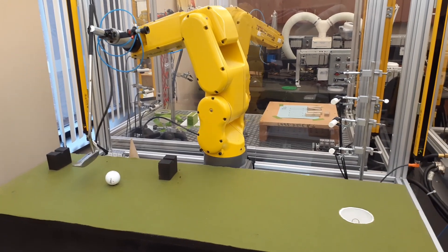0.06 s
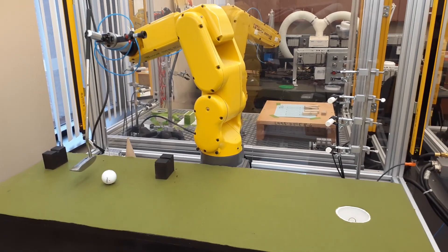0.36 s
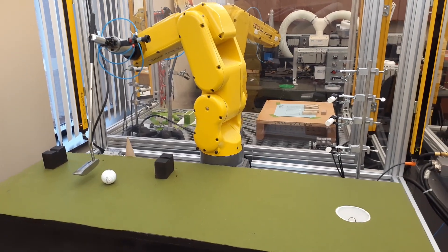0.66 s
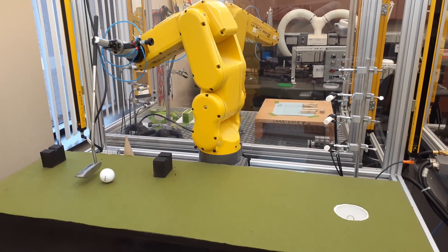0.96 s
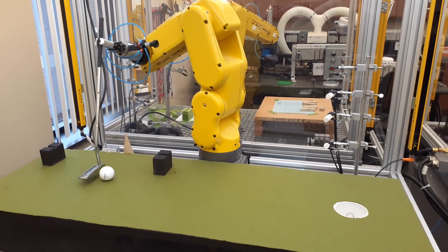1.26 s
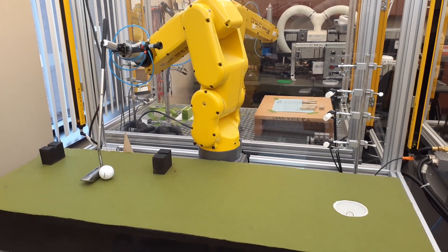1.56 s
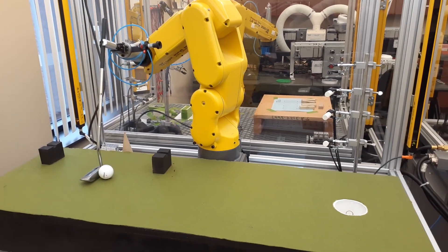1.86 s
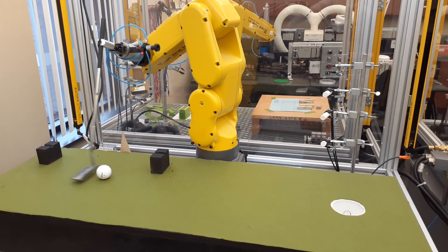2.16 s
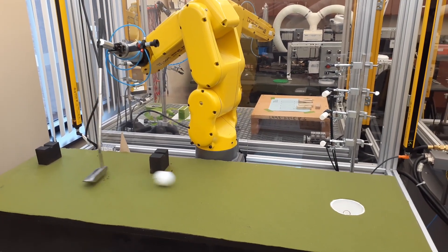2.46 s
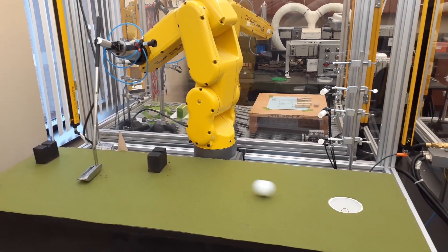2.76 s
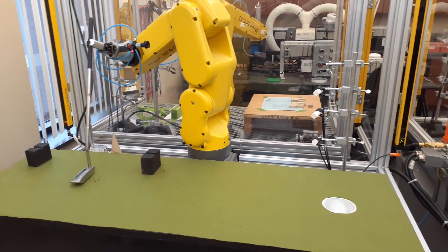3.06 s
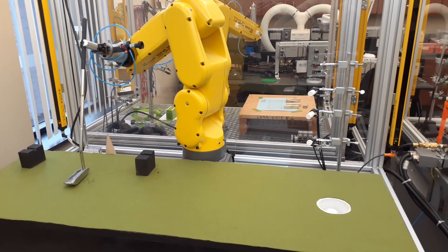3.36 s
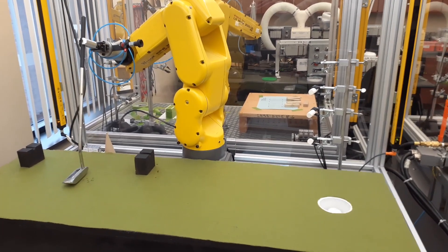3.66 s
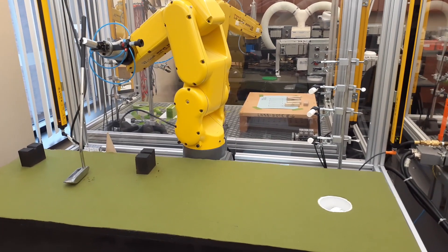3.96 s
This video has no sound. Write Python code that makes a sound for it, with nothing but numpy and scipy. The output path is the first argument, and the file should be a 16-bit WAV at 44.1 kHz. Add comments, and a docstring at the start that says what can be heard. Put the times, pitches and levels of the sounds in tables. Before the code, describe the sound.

A golf ball is struck with a sharp putter click, then drops into a plastic cup, rattling and bouncing to rest. Ventilation rumbles and a robot arm whines faintly in a small lab, heard from nearby.

```python
"""A small lab: a robot arm taps a golf ball across a putting table. The club face cracks and rings;
the ball drops into a plastic cup, rattles between its walls and bounces to rest, each blow
ringing the plastic and shaking the table top. Ventilation rumbles, the mains hum, and the
arm's servo drives whine faintly over the hiss of its gears."""
import sys
import numpy as np
from scipy import signal
from scipy.fft import rfft, irfft
from scipy.io import wavfile
from scipy.ndimage import uniform_filter1d

SR = 44100
rng = np.random.default_rng(int(sys.argv[2]) if len(sys.argv) > 2 else 0)


def transcribe(u):
    """Save the signal u as a 16-bit wav file named by the first command-line argument.

    u: samples, shape (n,) or (channels, n), limited to [-1, 1]; the rate is SR.
    q: integer samples, one column per channel.
    """
    v = np.clip(np.atleast_2d(u).T, -1, 1)
    q = np.round(v * 32767).astype(np.int16)
    wavfile.write(sys.argv[1], SR, q)


N = 176400
BLOW_S = 0.015  # window that sets a blow's level


def undb(db):
    return 10 ** (np.asarray(db) / 20)


def over_hz(points, hz):
    """Interpolate (f/Hz, value) rows on a log-frequency axis."""
    p = np.array(points, float)
    return np.interp(np.log(np.maximum(hz, 1)), np.log(p[:, 0]), p[:, 1])


def over_time(points, column=1):
    """Interpolate one column of (t/s, values) rows at every sample."""
    p = np.array(points, float)
    return np.interp(np.arange(N) / SR, p[:, 0], p[:, column])


def freqs(x):
    return np.fft.rfftfreq(x.shape[-1], 1 / SR)


def colour(x, points):
    """Zero-phase filter from (f/Hz, gain/dB) rows."""
    return irfft(rfft(x) * undb(over_hz(points, freqs(x))), x.shape[-1])


def causal(x, points):
    """Minimum-phase filter from (f/Hz, gain/dB) rows: no ringing ahead of the attack."""
    cepstrum = irfft(np.log(undb(over_hz(points, freqs(x)))))
    cepstrum[1:SR // 2] *= 2
    cepstrum[SR // 2 + 1:] = 0
    return irfft(rfft(x) * np.exp(rfft(cepstrum)))


def low_cut(x, hz):
    return signal.sosfilt(signal.butter(4, hz, "high", fs=SR, output="sos"), x)


def pan(x, points):
    """Constant-power pan from (f/Hz, L-R/dB) rows."""
    gain = undb(over_hz(points, freqs(x)) * np.array([[.5], [-.5]]))
    return irfft(rfft(x) * gain / np.sqrt(np.mean(gain ** 2, axis=0)), x.shape[-1])


def unit(x, span_s=None):
    """Scale to rms 1, overall or over the first span_s."""
    part = x if span_s is None else x[..., :int(span_s * SR)]
    return x / np.sqrt(np.mean(part ** 2))


def fade(t60_s):
    """Exponential decay, 1 s long."""
    return np.exp(-np.log(1000) * np.arange(SR) / SR / t60_s)


def add(out, x, start_s):
    i = int(start_s * SR)
    count = min(x.shape[-1], N - i)
    out[:, i:i + count] += x[:, :count]


def walk(rate_hz):
    """Smooth random wander, rms 1."""
    hold = int(SR / rate_hz)
    steps = np.repeat(rng.standard_normal(N // hold + 1), hold)
    return unit(uniform_filter1d(uniform_filter1d(steps, hold), hold)[:N])


def tone(hz, waver_db, rate_hz):
    """Sine of rms near 1 with a wavering level."""
    sine = np.sqrt(2) * np.sin(2 * np.pi * (hz * np.arange(N) / SR + rng.random()))
    return sine * undb(waver_db * walk(rate_hz))


def ring(modes, spread_rad, scatter_db=0, ear_lag_s=0.00019):
    """Struck modes of alternating sign; the higher ones reach the two ears more out of step."""
    t, out = np.arange(SR) / SR, 0
    for k, (hz, db, t60_s) in enumerate(modes):
        size, offset = rng.standard_normal(2)
        skew = np.pi * hz * ear_lag_s + spread_rad * offset * min(hz / 1000, 1)
        phase = np.clip(skew, -np.pi / 4, np.pi / 4) * np.array([[1], [-1]])
        envelope = undb(db + scatter_db * size) * fade(t60_s)
        out = out + (-1) ** k * envelope * np.sin(2 * np.pi * hz * t + phase)
    return out


# stereo width: f/Hz, side over mid/dB
WIDTH = [(60, -20), (130, -20.5), (280, -14), (550, -7.5), (1100, -2), (3000, 1.5)]


def stereo_noise(points, count):
    """Coloured noise, rms 1: alike in both ears in the bass, unrelated in the treble."""
    mid, side = rng.standard_normal((2, count))
    return unit(colour(mid + colour(side, WIDTH) * np.array([[1], [-1]]), points))


# fan spectrum: f/Hz, relative density/dB
FAN_SPECTRUM = [(25, -12), (38, -17), (52, -6.5), (85, -5), (130, 0.5), (190, -1.5), (270, -3), (380, -12),
                (650, -13), (1000, -17.5), (1400, -21), (1900, -20.5), (2500, -36.5), (3500, -44.5),
                (5500, -50), (7500, -58), (12000, -58), (14000, -58), (16000, -50)]
# balance of fan, arm and putter: f/Hz, L-R/dB
LAB_PAN = [(600, 0.5), (1300, 1), (2400, -1.5), (4200, 18), (7000, 15), (13000, 17)]


def ventilation(fan_db=-40.5, hum_db=-51, hum_hz=120.7):
    """Fan rumble plus mains hum."""
    fan = undb(fan_db + .5 * walk(rate_hz=5.35)) * stereo_noise(FAN_SPECTRUM, N)
    hum = undb(hum_db) * tone(hum_hz, waver_db=2.5, rate_hz=6.8)
    return pan(fan, LAB_PAN) + hum


# steady switching harmonics: order; left/dB, right/dB
WHINE_ORDERS = [1, 2, 4]
WHINE_DB = [(-69, -96), (-61.5, -87.5), (-63.5, -90)]
# third harmonic and its sidebands: f/Hz; relative level/dB
THIRD_HZ = [11143, 11357, 11570]
THIRD_DB = [-10, 5, -22]
# their envelope: t/s, left/dB, right/dB
THIRD_ENVELOPE = [(0, -57.5, -78), (.2, -57, -78), (.45, -60.5, -82), (.58, -60.5, -84), (.8, -56, -74),
                  (1.3, -54, -65), (1.7, -59, -70.5), (2.15, -66.5, -72), (2.45, -63.5, -71),
                  (2.7, -66, -72.5), (3.0, -57.5, -70), (3.5, -57.5, -81), (4, -57, -77)]


def servo_drives(switching_hz=3785, waver_db=.6):
    """Switching whine; the third harmonic is strongest, and swells and sinks."""
    steady = sum(undb([[left], [right]]) * tone(order * switching_hz, waver_db, rate_hz=12)
                 for order, (left, right) in zip(WHINE_ORDERS, WHINE_DB))
    third = sum(undb(db) * tone(hz, waver_db, rate_hz=30) for hz, db in zip(THIRD_HZ, THIRD_DB))
    envelope = undb([over_time(THIRD_ENVELOPE, column) for column in (1, 2)])
    return steady + third * envelope


# axis whine: t/s, level/dB of harmonics 1, 2, 3
AXIS_ENVELOPE = [(0, -76, -66, -82), (.1, -76, -66, -86), (.16, -67, -65, -74), (.22, -80, -66, -76),
                 (.32, -70, -65, -82), (.42, -78, -66, -76), (.47, -63, -66, -74), (.62, -71, -70, -78),
                 (.71, -70, -69, -81), (.85, -77, -58.5, -81), (1.25, -73, -59.5, -84),
                 (1.38, -70, -61, -75), (1.5, -75, -62.5, -83), (1.75, -82, -79, -68),
                 (2.15, -84, -85, -65), (2.3, -78, -62, -81), (2.5, -77, -76, -88), (4, -82, -96, -84)]
# gear hiss: f/Hz, relative density/dB; t/s, level/dB
GEAR_SPECTRUM = [(2000, 1), (3300, -2.5), (4600, -1), (7000, -12), (8700, -5), (10300, -11), (12300, 2),
                 (14000, -11), (16000, -1)]
GEAR_ENVELOPE = [(0, -59.5), (.3, -61), (.65, -61.5), (1.3, -59.5), (1.7, -62), (2.1, -63), (2.5, -61),
                 (3, -67), (4, -90)]


def arm_motion(axis_hz=4000):
    """The moving axis whines and its gears hiss."""
    whine = sum(undb(over_time(AXIS_ENVELOPE, k)) * tone(k * axis_hz, waver_db=1, rate_hz=21)
                for k in (1, 2, 3))
    hiss = stereo_noise(GEAR_SPECTRUM, N) * undb(over_time(GEAR_ENVELOPE) + 1.4 * walk(rate_hz=26))
    return pan(whine + hiss, LAB_PAN)


# lab echo: f/Hz, gain/dB; f/Hz, t60/s
ROOM_EQ = [(100, -2.5), (250, 10), (600, 2.5), (1300, -2), (2500, 2), (5000, -9.5), (10000, 0),
           (16000, -28)]
ROOM_DECAY = [(150, 0.46), (500, 0.32), (1500, 0.2), (4000, 0.33), (14000, 0.25)]


def room(x, wet_db=-7.5, delay_s=.005):
    """Direct sound plus dense reflections, decaying band by band."""
    noise = stereo_noise([(20, 0), (20000, 0)], SR)
    centres_hz, tail = [hz for hz, _ in ROOM_DECAY], 0
    for weights, (_, t60_s) in zip(np.eye(len(centres_hz)), ROOM_DECAY):
        share = over_hz(list(zip(centres_hz, weights)), freqs(noise))
        band = irfft(rfft(noise) * share)
        tail = tail + band * fade(t60_s) / np.linalg.norm(fade(t60_s))
    echo = np.zeros((2, N))
    add(echo, signal.fftconvolve(x, causal(tail, ROOM_EQ), axes=1), delay_s)
    return x + undb(wet_db) * echo


# arm tick, club crack: f/Hz, relative density/dB
TICK_SPECTRUM = [(2000, -17), (4500, -6), (6000, 0), (9500, -5), (12000, -18), (16000, -33)]
CRACK_SPECTRUM = [(300, 1), (1200, 4.5), (2600, -2.5), (3400, -10), (4100, 1), (5400, -11.5), (6400, -6),
                  (7200, -13), (8700, -7.5), (10800, -12), (11700, -5), (13000, -14), (16000, -18)]
# putter-on-ball modes: f/Hz, level/dB, t60/s
PUTTER_MODES = [(538, -34.5, 0.35), (651, -36.5, 0.18), (1200, -28.5, 0.038), (1497, -35, .1),
                (1740, -28, 0.026), (3950, -34, .045), (4100, -36, 0.054), (4310, -38, 0.059),
                (6260, -46, .05), (7850, -50, 0.032), (9080, -53, 0.067), (11850, -44, 0.054)]


def putter(tick_db=-58, crack_db=-37):
    """The arm ticks as it swings; the club face cracks against the ball and rings."""
    out = np.zeros((2, N))
    tick = unit(stereo_noise(TICK_SPECTRUM, SR) * fade(t60_s=0.068), BLOW_S)
    add(out, undb(tick_db) * tick, start_s=2.2552)
    face = ring(PUTTER_MODES, spread_rad=0.35)
    crack = unit(stereo_noise(CRACK_SPECTRUM, SR) * fade(t60_s=.08), BLOW_S)
    add(out, face + undb(crack_db) * crack, start_s=2.3668)
    return out


# modes of the table top and the hollow under it: f/Hz; relative level/dB, t60/s
TABLE_HZ = [225, 260, 320, 353, 440, 516, 564, 657, 780, 821, 983, 1074, 1303]
TABLE_RING = [(-22, 0.25), (-19, .6), (-30, .5), (-14, 0.42), (-15.5, 0.38), (-12.5, 0.35), (-13.5, 0.53),
              (-11.5, 0.33), (-26, 0.21), (-23, 0.27), (-15, 0.18), (-24, 0.37), (-20, 0.16)]


def table_boom(thud_db, coupling_db=1, rise_s=0.077):
    """A thud in the cup builds up in the table's modes."""
    modes = np.column_stack([TABLE_HZ, TABLE_RING])
    boom = ring(modes, spread_rad=0.19, scatter_db=1.5)
    return undb(thud_db + coupling_db) * boom * (1 - fade(rise_s))


# dense modes of the plastic: f/Hz, relative density/dB
PLASTIC_SPECTRUM = [(150, -25), (300, 0.5), (600, 8), (1300, 2), (2100, -6), (2500, -11.5), (3000, -13.5),
                    (3700, -13.5), (4400, -19), (5400, -16.5), (7200, -25), (8400, -18.5), (10000, -24.5),
                    (12500, -15.5), (14000, -28), (16000, -20.5)]
# thud, knock, clack, click and tick bands: centre f/Hz; edge f/Hz
BAND_HZ = [450, 1050, 2200, 5000, 10000]
BAND_EDGES_HZ = [700, 1500, 3600, 7000]


def strike(modes, bands_db, dense_db, spot_hz, spot_db, t60_s=0.086, rise_s=0.0024, spot_oct=0.088):
    """One blow on plastic: clear and dense modes, coloured by where and how hard the ball lands."""
    dense = unit(stereo_noise(PLASTIC_SPECTRUM, SR) * fade(t60_s) * (1 - fade(rise_s)), BLOW_S)
    clear = unit(ring(modes, spread_rad=0.21, scatter_db=2.9), BLOW_S)
    # the struck spot favours one resonance
    corners_hz = spot_hz * 2 ** (spot_oct * np.array([-1.65, -1.3, 1.14, 0.77]))
    blow = causal(clear + undb(dense_db) * dense, list(zip(corners_hz, [0, spot_db, spot_db, 0])))
    power = abs(rfft(blow)) ** 2 / SR ** 2 / BLOW_S
    band = np.searchsorted(BAND_EDGES_HZ, freqs(blow))
    gains_db = [db - 10 * np.log10(power[band == k].sum() if power.ndim == 1 else power[:, band == k].sum())
                for k, db in enumerate(bands_db)]
    return causal(blow, list(zip(BAND_HZ, gains_db)))


# cup wall and floor modes: f/Hz; relative level/dB, t60/s
WALL_HZ = [340, 505, 655, 790, 985, 1130, 1298, 1470, 1710, 1820, 1970, 2225, 2960, 4380, 5950, 8120]
WALL_RING = [(-4, .09), (0.5, 0.094), (-2.5, 0.093), (-1, 0.042), (-5, .05), (-7.5, 0.077), (-11, 0.17),
             (-10, 0.08), (-11, 0.073), (-23, 0.085), (-16, .1), (-18, 0.079), (-21, 0.035), (-15, 0.023),
             (-20, .04), (-24, 0.054)]
FLOOR_HZ = [320, 570, 635, 805, 950, 1085, 1200, 1755, 2040, 4050, 4220, 4400, 6040, 6260, 8500]
FLOOR_RING = [(-11.5, 0.078), (-3.5, 0.053), (-3, 0.083), (-2, 0.074), (-10, .04), (-4.5, 0.043),
              (-1.5, 0.046), (-9.5, 0.082), (-13, .06), (-18.5, 0.022), (-11.5, 0.021), (-15.5, 0.029),
              (-20.5, 0.028), (-21.5, 0.022), (-32, 0.026)]
# ball impacts: t/s, level/dB in each of the five bands, dense over clear/dB, spot f/Hz, spot lift/dB
WALL_HITS = [(3.0704, -13, -19.5, -22.5, -37.5, -42, -5, 483, 3.5),
             (3.0853, -13, -24.5, -30, -49, -42, -2, 652, 12),
             (3.1076, -16.5, -13, -19, -28.5, -31.5, -5, 1336, 5),
             (3.1508, -20, -18, -23, -24.5, -36, -3.5, 4440, 10),
             (3.1692, -14.5, -22, -23.5, -36, -47, 1.5, 3060, 12),
             (3.2205, -23, -27, -35, -56, -55, -7, 407, 12),
             (3.2862, -24, -45, -32.5, -41.5, -74, -7, 2960, 7),
             (3.3175, -22, -43.5, -33, -48, -64, 5, 3050, 10)]
FLOOR_HITS = [(3.1918, -16.5, -14, -24, -28.5, -38, -5.5, 1200, 5.1),
              (3.2575, -24.5, -21, -24.5, -33, -41.5, -6.5, 2100, 3.6),
              (3.3510, -18.5, -20.5, -26.5, -32, -46, -3, 743, 6.8),
              (3.4446, -23.5, -21, -33.5, -36, -50, -11, 1760, 4),
              (3.6506, -28, -27.5, -39.5, -44.5, -66, -13, 1770, 8.6),
              (3.7100, -30, -41.5, -42.5, -61.5, -61, -12, 2030, 4.1),
              (3.7610, -39, -47.5, -54, -76, -72, -17, 1755, 6.8)]


def ball_in_cup():
    """The ball rattles against the wall and bounces on the floor; each thud rings the table."""
    out = np.zeros((2, N))
    wall = np.column_stack([WALL_HZ, WALL_RING])
    floor = np.column_stack([FLOOR_HZ, FLOOR_RING])
    for hits, modes in ((WALL_HITS, wall), (FLOOR_HITS, floor)):
        for start_s, *bands_db, dense_db, spot_hz, spot_db in hits:
            boom = table_boom(thud_db=bands_db[0])
            add(out, boom + strike(modes, bands_db, dense_db, spot_hz, spot_db), start_s)
    return low_cut(out, hz=130)


# balance of the cup: f/Hz, L-R/dB
CUP_PAN = [(600, .6), (1400, 0), (2500, -3.5), (4200, 12.5), (7000, 6), (9500, 15), (13000, 16)]


def scene():
    """Impacts with the lab's echo, over the arm and the ventilation."""
    rattle = pan(room(ball_in_cup()), CUP_PAN)
    putt = pan(room(putter()), LAB_PAN)
    return rattle + putt + servo_drives() + arm_motion() + ventilation()


def record(dry):
    """Bass cut, soft peak limit, steep treble cut."""
    ceiling, top_hz = .97, 15650
    x = low_cut(dry, hz=40)
    rounded = x / (1 + (x / ceiling) ** 6) ** (1 / 6)
    return signal.sosfilt(signal.ellip(10, .2, 90, top_hz, fs=SR, output="sos"), rounded)


dry = scene()
out = record(dry)
transcribe(out)
```